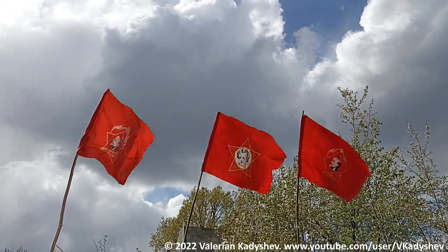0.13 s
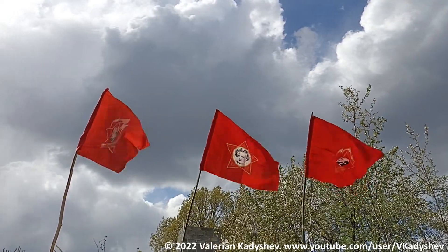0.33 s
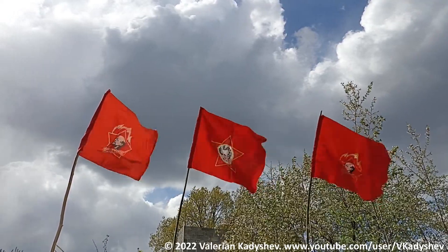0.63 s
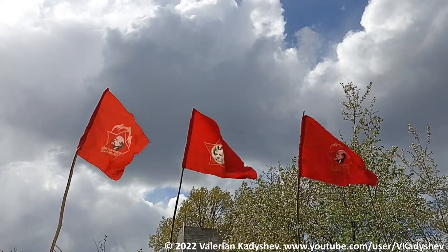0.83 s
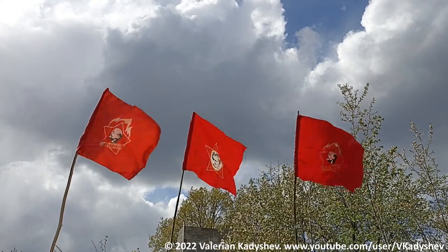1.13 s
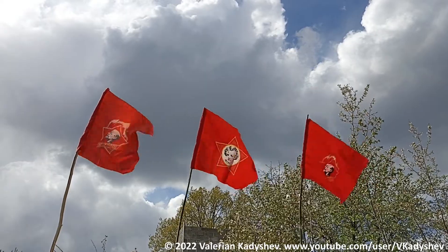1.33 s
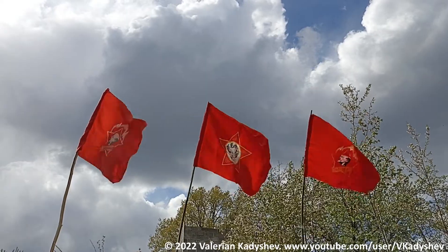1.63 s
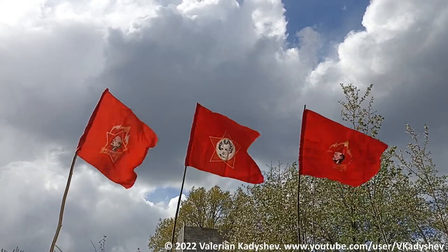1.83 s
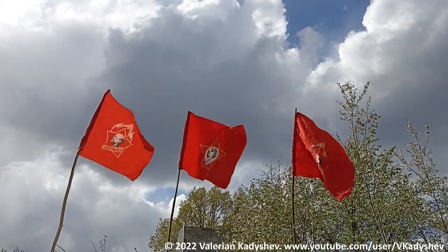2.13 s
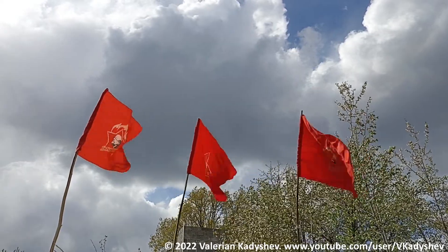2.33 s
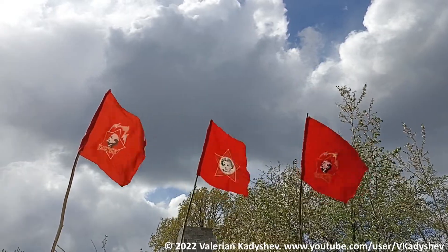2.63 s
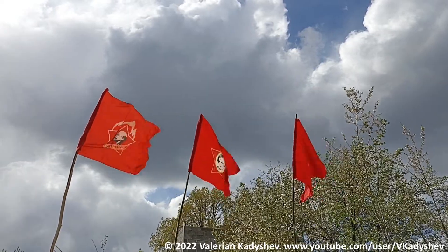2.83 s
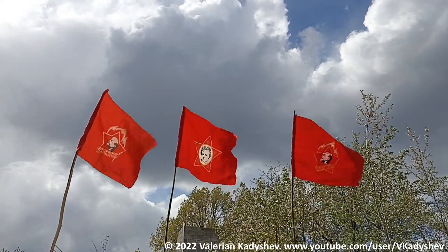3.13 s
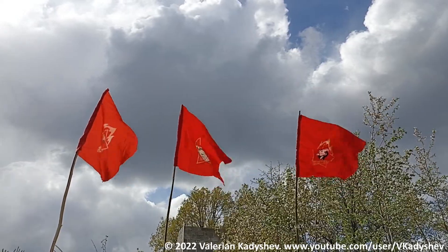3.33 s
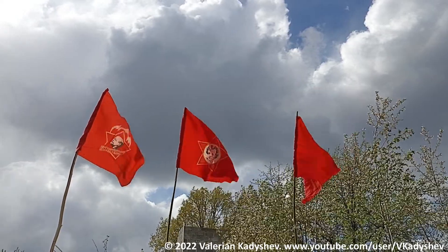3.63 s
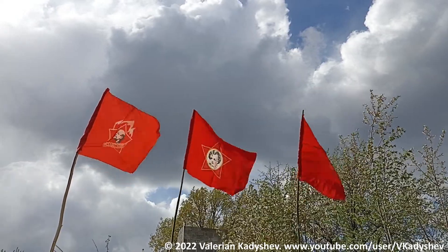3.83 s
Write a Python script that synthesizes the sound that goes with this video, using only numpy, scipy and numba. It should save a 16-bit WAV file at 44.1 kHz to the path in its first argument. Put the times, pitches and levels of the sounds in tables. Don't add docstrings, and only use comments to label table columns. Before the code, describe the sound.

Wind buffets a small camera microphone outdoors, far stronger on the left; a low flutter builds into hard, crackling thumps after two seconds, with faint tree hiss and tiny flag-cloth ticks behind.

```python
import sys
import numpy as np
from scipy import signal
from scipy.fft import rfft, irfft
from scipy.io import wavfile
from scipy.ndimage import uniform_filter1d
from numba import njit

SR = 44100
rng = np.random.default_rng(int(sys.argv[2]) if len(sys.argv) > 2 else 0)


def ratio_of_db(decibels):
    return 10 ** (np.asarray(decibels, float) / 20)


def int16_out(signal):
    q = np.round(np.clip(np.atleast_2d(signal).T, -1, 1) * 32767)
    wavfile.write(sys.argv[1], SR, q.astype(np.int16))


N = 176400


@njit
def bumps(out_len, at, sigma, size, odd):
    y = np.zeros(out_len)
    for k in range(len(at)):
        first = max(int(at[k] - 4 * sigma[k]), 0)
        last = min(int(at[k] + 4 * sigma[k]) + 1, out_len)
        for i in range(first, last):
            u = (i - at[k]) / sigma[k]
            y[i] += size[k] * np.exp(-u * u / 2) * (1 - odd + odd * u)
    return y


def walk(rate_hz):
    hold = int(SR / rate_hz)
    steps = np.repeat(rng.standard_normal(N // hold + 1), hold)
    return 1.3 * uniform_filter1d(uniform_filter1d(steps, hold), hold)[:N]


def buffet(puffs, calm_db, calm_hz, spread, scatter_db, trim_db):
    eddies_per_s, size_scale, small_db = 420, 0.86, -4.5
    count = 4 * eddies_per_s
    jitter, size_a, size_b, strength, sign = rng.random((count, 5)).T
    t = (np.arange(count) + jitter) / eddies_per_s
    p = np.array(puffs, float)
    at_s, length_s, level_db, eddy_hz = p[:, :1], p[:, 1:2], p[:, 2:3], p[:, 3:]
    power = ratio_of_db(2 * level_db) * np.exp(-3.0 * ((t - at_s) / length_s) ** 2)
    calm = ratio_of_db(2 * calm_db + 5 * walk(7.2)[(t * SR).astype(int)])
    total = power.sum(0) + calm
    mean_hz = ((power * eddy_hz).sum(0) + calm * calm_hz) / total
    small = size_a + size_b - 1
    sigma = SR / (2 * np.pi * size_scale * mean_hz * np.exp(spread * small))
    size = ratio_of_db(trim_db + small_db * small + scatter_db * (2 * strength - 1)) * np.sign(sign - .5)
    size = size * np.sqrt(total * SR / eddies_per_s / sigma)
    return bumps(N, t * SR, sigma, size, 1.)


# [t/s, pressure, width/ms]
STRONG_SLAPS = [(1.29, 0.47, 1.3), (1.7407, -0.3, 1.8), (2.4393, 0.48, 1.8), (2.4545, -0.45, 2.0),
                (2.4628, 0.83, 0.8), (2.556, 0.36, 1.6), (2.6055, 0.52, 1.7), (2.6473, 0.41, 2.0),
                (2.7043, 0.71, 1.2), (2.7153, 0.79, 1.0), (2.9021, 0.77, 1.3), (3.0545, 0.51, 1.6),
                (3.1688, 0.48, 1.2), (3.4344, -0.49, 0.9), (3.4696, -0.47, 1.5), (3.6032, 0.48, 2.2),
                (3.6144, 0.5, 1.2), (3.6348, 0.86, 1.4), (3.6465, -0.42, 1.5), (3.763, -0.34, 1.2),
                (3.8394, -0.49, 2.1), (3.879, 0.73, 1.6), (3.8983, -0.6, 1.6)]
# [t/s, pressure, width/ms]
MORE_SLAPS = [(0.3346, -0.11, 1.4), (0.7489, -0.15, 1.5), (0.7646, 0.21, 1.7), (0.7923, -0.2, 1.9),
              (0.8597, -0.18, 2.8), (0.9627, -0.15, 2.2), (1.1453, -0.11, 2.0), (1.6883, 0.15, 1.6),
              (1.7037, -0.13, 2.5), (2.205, 0.12, 2.0), (2.2351, 0.19, 1.3), (2.2534, 0.24, 1.3),
              (2.2953, -0.26, 2.2), (2.3089, -0.3, 1.6), (2.3421, -0.16, 2.2), (2.5423, 0.24, 1.0),
              (2.5837, 0.24, 1.2), (2.9184, -0.3, 1.7), (2.9849, 0.27, 1.7), (2.9998, 0.27, 1.8),
              (3.1222, -0.32, 1.7), (3.1378, -0.31, 1.6), (3.1951, -0.37, 1.5), (3.2159, -0.27, 1.5),
              (3.2359, -0.24, 1.5), (3.3004, -0.12, 3.1), (3.3157, -0.13, 1.7), (3.4055, -0.33, 1.8),
              (3.499, 0.35, 2.0), (3.5623, -0.34, 2.0), (3.7088, -0.17, 1.2), (3.7482, -0.21, 1.9),
              (3.7789, 0.19, 2.2), (3.9254, -0.46, 2.2), (3.9588, -0.33, 1.9), (3.9742, -0.3, 2.3),
              (3.9891, -0.25, 1.0)]
# [t/s, level/dB, width/ms]
CRACKS = [(2.443, -13, 0.4), (2.4625, -23.5, 0.11), (2.506, -15.5, 0.32), (2.542, -26, 0.41),
          (2.581, -22, .25), (2.655, -19, 0.41), (2.7125, -20, 0.24), (2.9005, -14.5, .3),
          (3.042, -18, 0.38), (3.171, -25, 0.24), (3.199, -23, .35), (3.604, -20, 0.43), (3.763, -36, .3),
          (3.85, -29, 0.38), (3.874, -17.5, 0.37), (3.897, -25, 0.35), (3.991, -25, .3)]


def slaps():
    rebound, rebound_width, rebound_lag = .42, 1.7, 2.6
    at_s, pressure, width_ms = np.array(STRONG_SLAPS + MORE_SLAPS, float).T
    at, sigma = at_s * SR, width_ms * SR / 1000 * .5
    push = bumps(N, at, sigma, pressure, 0.)
    lag, wide = rebound_lag * sigma, rebound_width * sigma
    after = bumps(N, at + lag, wide, pressure, 0.)
    before = bumps(N, at - 1.01 * lag, wide, pressure, 0.)
    push = push - rebound * (after + 0.42 * before)
    crack_s, crack_db, crack_ms = np.array(CRACKS, float).T
    cracks = bumps(N, crack_s * SR, crack_ms * SR / 1000, ratio_of_db(crack_db), 1.)
    return 1.334 * push + cracks


def hush():
    at_s, _, width_ms = np.array(STRONG_SLAPS + MORE_SLAPS, float).T
    cover = bumps(N, at_s * SR, width_ms * SR / 1000 * 1.99, np.full(len(at_s), 1.26), 0.)
    return np.exp(-cover)


# [t/s, length/s,
# level/dB, eddy f/Hz]
LEFT_PUFFS = [(0.072, 0.07, -39, 110), (0.162, 0.031, -32, 109), (0.261, 0.06, -30, 133),
              (0.333, 0.029, -22, 126), (0.423, 0.048, -18.5, 79.4), (0.778, 0.039, -16, 168),
              (0.861, 0.039, -14.5, 83), (0.959, 0.092, -17.5, 82.6), (1.001, 0.025, -35, 110),
              (1.065, 0.029, -20, 90), (1.149, 0.064, -20.5, 91), (1.236, 0.047, -25.5, 109),
              (1.292, 0.016, -16.5, 157), (1.329, 0.022, -14.5, 87), (1.387, 0.049, -21.5, 100),
              (1.518, 0.027, -21.5, 125), (1.63, 0.14, -24.5, 122), (1.7, 0.024, -14, 129),
              (1.739, 0.03, -18.5, 147), (1.82, 0.067, -24, 120), (1.857, 0.027, -26.5, 119),
              (1.934, 0.063, -29.5, 108), (2.002, 0.03, -22.5, 113), (2.077, 0.085, -28, 108),
              (2.151, 0.033, -27.5, 115),
              (2.251, 0.069, -17, 159), (2.295, 0.026, -12.5, 174), (2.336, 0.013, -12, 139),
              (2.391, 0.032, -26, 140), (2.456, 0.025, -7.5, 228), (2.507, 0.0087, -12.5, 274),
              (2.551, 0.025, -11.5, 175), (2.606, 0.0068, -9, 138), (2.648, 0.018, -15, 135),
              (2.709, 0.019, -7.5, 270), (2.904, 0.017, -9.5, 250), (2.989, 0.033, -13.5, 132),
              (3.05, 0.051, -12.5, 184),
              (3.13, 0.019, -6, 158), (3.193, 0.047, -9.5, 224), (3.299, 0.11, -40, 110),
                (3.434, 0.028, -9.5, 213), (3.535, 0.023, -12, 105), (3.574, 0.024, -11.5, 100),
                (3.608, 0.01, -11, 200), (3.633, 0.014, -7.5, 157), (3.707, 0.016, -39, 226),
                (3.765, 0.086, -18.5, 201), (3.881, 0.064, -5.5, 188),
              (2.44, 0.017, -22, 200),
    (2.581, 0.07, -17, 249),
    (2.68, 0.047, -15.5, 219),
    (2.81, 0.24, -21.5, 131),
    (2.928, 0.028, -19, 168),
    (3.362, 0.26, -18.5, 109),
    (3.488, 0.09, -11.5, 138),
    (3.669, 0.028, -16, 161),
    (3.922, 0.035, -9.5, 140),
    (3.99, 0.031, -13.5, 232),
]


def left_wind():
    puffs = LEFT_PUFFS
    swarm = buffet(puffs, calm_db=-40, calm_hz=105, spread=0.72, scatter_db=7.0, trim_db=-6.0)
    return swarm * hush() + slaps()


# [t/s, length/s, level/dB, eddy f/Hz]
LEE_PUFFS = [(2.109, 0.048, -34.5, 140), (2.376, 0.11, -38, 140), (2.506, 0.049, -23.5, 121),
             (2.619, 0.028, -33, 160), (2.68, 0.018, -13.5, 91), (2.712, 0.019, -20, 129),
             (2.76, 0.024, -17.5, 100), (2.83, 0.027, -31, 160), (3.024, 0.083, -37, 170),
             (3.078, 0.026, -29, 150), (3.139, 0.044, -19.5, 88), (3.244, 0.032, -43, 190),
             (3.461, 0.065, -52, 208), (3.662, 0.04, -21, 100), (3.783, 0.025, -18.5, 90),
             (3.921, 0.053, -30.5, 140), (3.966, 0.032, -42, 130)]


def right_wind():
    return buffet(LEE_PUFFS, calm_db=-68, calm_hz=100, spread=0.78, scatter_db=6.0, trim_db=-4.0)


def highpass(x, cut_hz):
    return signal.sosfilt(signal.butter(2, cut_hz, "high", fs=SR, output="sos"), x)


# [t/s, peak level/dB, lowest f/Hz, rustle/s]
CLOTH_TICKS = [(1.052, -47.5, 9000, .003), (2.631, -56, 9000, .003), (2.668, -52, 9000, .003),
               (2.834, -46.5, 6000, .005), (2.968, -42, 7000, .002), (2.9875, -47, 10000, 0.011),
               (3.0884, -51, 11000, .003), (3.1246, -52, 9000, .008), (3.2213, -45, 4500, .004),
               (3.227, -45.5, 4500, .004), (3.241, -55, 11000, .002), (3.3088, -56, 9000, .004),
               (3.337, -50, 9500, .003), (3.3777, -52, 10000, .005), (3.462, -44, 5000, .003)]


def cloth():
    t, noise = np.arange(N) / SR, rng.standard_normal(N)
    gust_db = 5.1 * np.exp(-((t - 3.2) / .35) ** 2)
    crackle = (rng.random(N) < .006) * ratio_of_db(-53 + 2.0 * rng.exponential(1, N) + gust_db)
    x = highpass(crackle * rng.standard_normal(N), 5000)
    for at_s, peak_db, low_hz, rustle_s in CLOTH_TICKS:
        dt = np.abs(t - at_s - .002)
        envelope = np.exp(-dt / .0006) + .15 * np.exp(-dt / rustle_s)
        x = x + highpass(ratio_of_db(peak_db + 6.0) * envelope * noise, low_hz)
    return np.array([x, 0 * x])


# [t/s, level/dB]
TREE_SWELL = [
    (0, -3),
    (.5, -2.5),
    (1, -1.5),
    (1.5, -1),
    (2, -1),
    (2.5, -1),
    (3, -1),
    (3.4, -1),
    (4, -1.5),
]
# [f/Hz, density/(dB per Hz)]
TREE_COLOUR = [
    (100, -67.5),
    (300, -74),
    (1000, -81),
    (2000, -84.5),
    (3500, -93.5),
    (7400, -96.5),
    (11400, -105),
    (15500, -105),
]


def trees():
    lag_samples, leaves_db_per_s = 13, 1.25
    t, log_hz = np.arange(N) / SR, np.log(np.fft.rfftfreq(N, 1 / SR) + 1)
    tone_hz, tone_db = np.array(TREE_COLOUR, float).T
    swell_db = np.interp(t, *np.array(TREE_SWELL).T)
    colour = ratio_of_db(np.interp(log_hz, np.log(tone_hz), tone_db)) * np.sqrt(SR / 2)
    noise = rng.standard_normal(N)
    shared = rfft(np.array([np.roll(noise, lag_samples), noise]))
    own = rfft(rng.standard_normal((2, N)))
    alike = np.clip(.5 - .17 * np.abs(log_hz - np.log(900)), 0, .9)
    spec = colour * (np.sqrt(alike) * shared + np.sqrt(1 - alike) * own)
    out, near_db = 0, 0.24 * walk(2.8)
    for centre in np.arange(np.log(30), np.log(20000), .5):
        band = np.sqrt(np.clip(1 - np.abs(log_hz - centre) / .5, 0, 1))
        rise_db = leaves_db_per_s * (t - 2) * (centre > np.log(6000))
        grow = np.clip(1.46 + 0.31 * (centre - np.log(1000)), .1, 3)
        level_db = grow * swell_db + rise_db + near_db + 0.64 * walk(17)
        out = out + irfft(spec * band, N) * ratio_of_db(level_db)
    return out


# [edge f/Hz, level above it/dB]
SHELVES = [
    (3620, -4.5),
    (6900, -3.5),
    (11600, 2),
]


def port_colour(x):
    port_hz, port_width_hz, port_db = 11800, 2720, 15
    hz = np.fft.rfftfreq(N, 1 / SR)
    shelf_db = sum(db * (hz > edge_hz) for edge_hz, db in SHELVES)
    skew = 1 + .5 * (hz > port_hz)
    peak_db = port_db * np.clip(1 - np.abs(hz - port_hz) / port_width_hz / skew, 0, 1)
    left_db = shelf_db + peak_db + 1.8 * (hz > SHELVES[-1][0])
    return irfft(rfft(x) * ratio_of_db(np.array([left_db, shelf_db])), N)


# [t/s, depth/dB, release/s]
DUCKS = [
    (2.463, -7, 0.37),
    (2.716, -7, 0.23),
    (2.903, -4.5, 0.28),
]


def left_gain():
    t = np.arange(N) / SR
    ducks_db = [depth_db * (t > at_s) * np.clip(1 - ((t - at_s) / release_s) ** 2, 0, 1)
                for at_s, depth_db, release_s in DUCKS]
    return ratio_of_db(uniform_filter1d(np.min(ducks_db, axis=0), size=200))


def scene():
    wind = np.array([left_wind(), right_wind()])
    back = port_colour(trees() + cloth())
    back[0] *= left_gain()
    return back + wind


def top_cut(x):
    return signal.sosfilt(signal.butter(12, 15730, fs=SR, output="sos"), x)


def record(dry):
    mic_cut_hz, top_hz = 64.8, 15750
    x = signal.sosfiltfilt(signal.butter(3, mic_cut_hz, "high", fs=SR, output="sos"), dry)
    x = signal.sosfilt(signal.ellip(10, .3, 70, top_hz, fs=SR, output="sos"), x)
    return top_cut(x)


dry = scene()
out = record(dry)
int16_out(out)
```